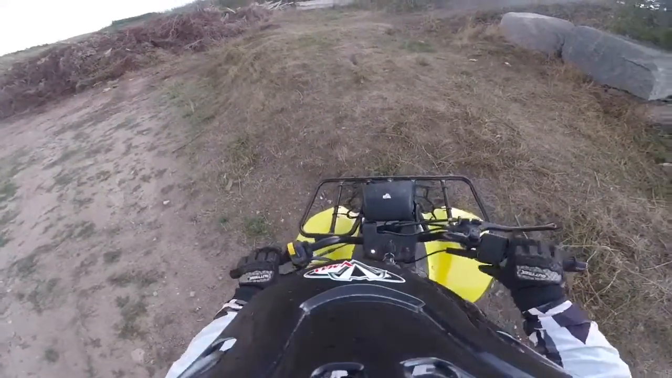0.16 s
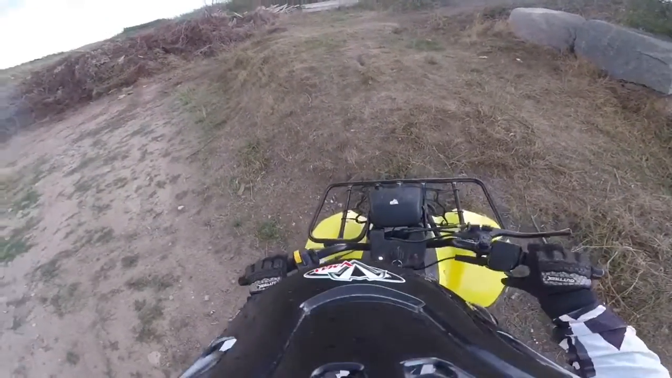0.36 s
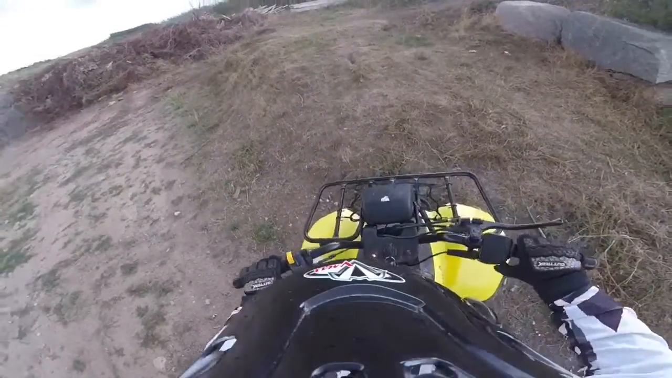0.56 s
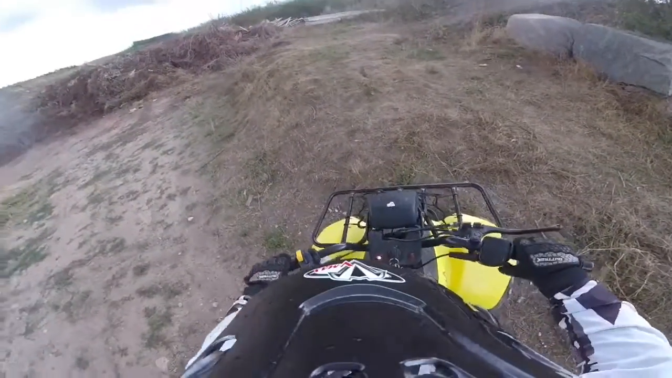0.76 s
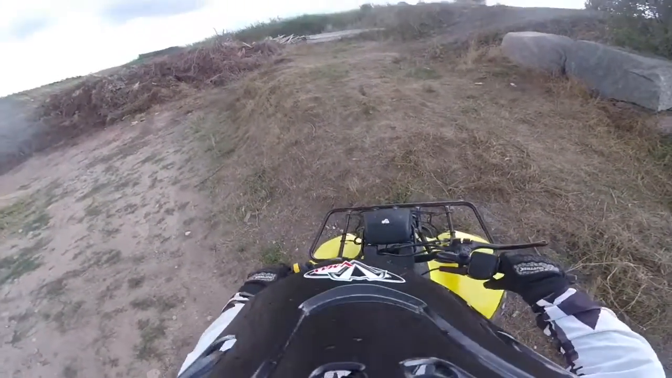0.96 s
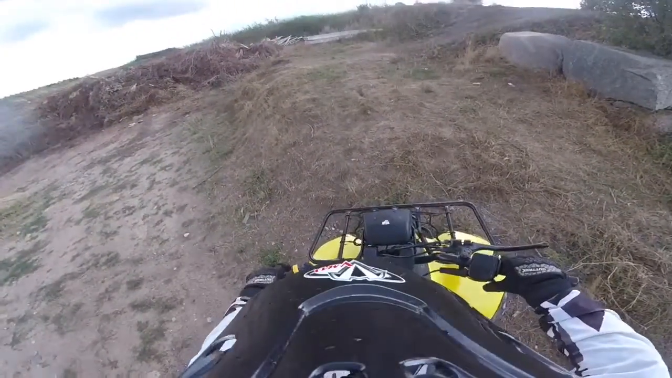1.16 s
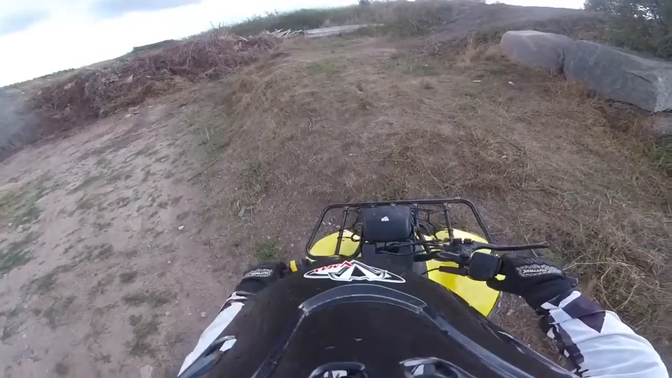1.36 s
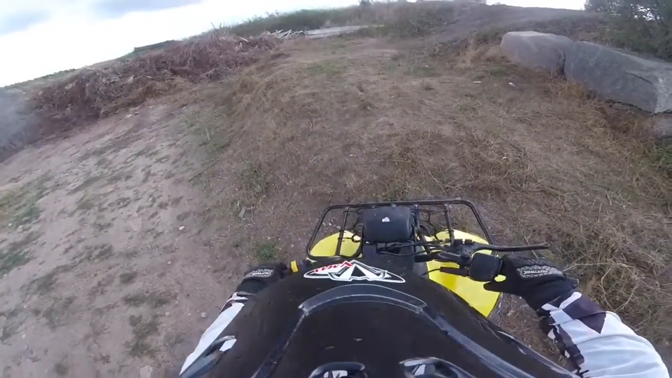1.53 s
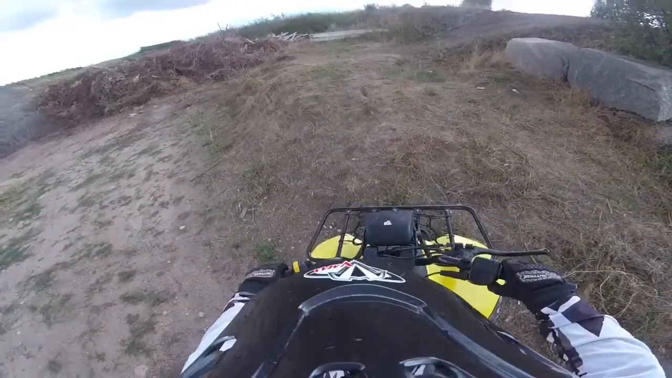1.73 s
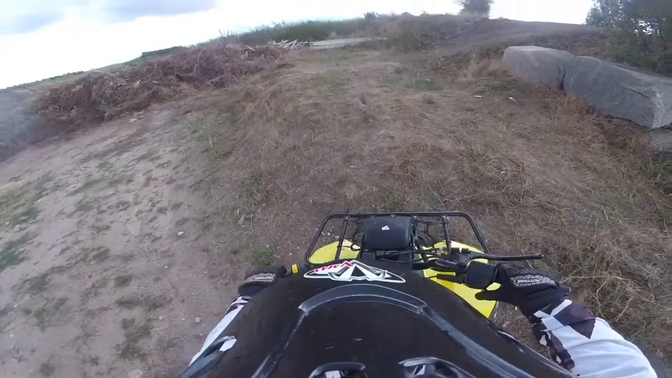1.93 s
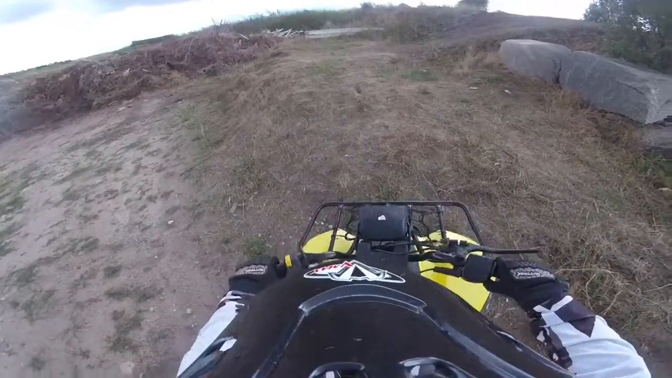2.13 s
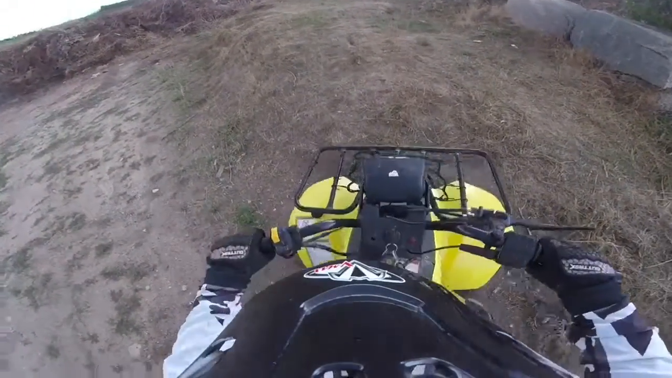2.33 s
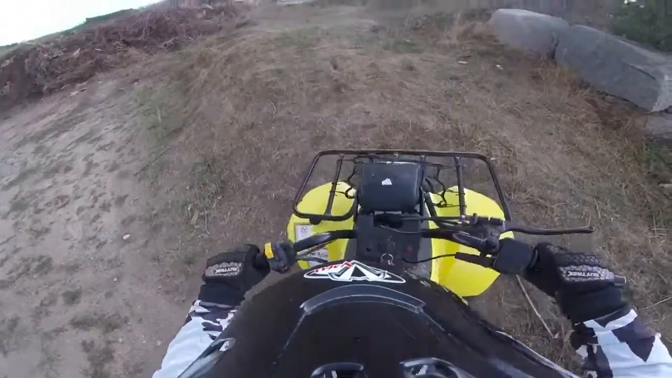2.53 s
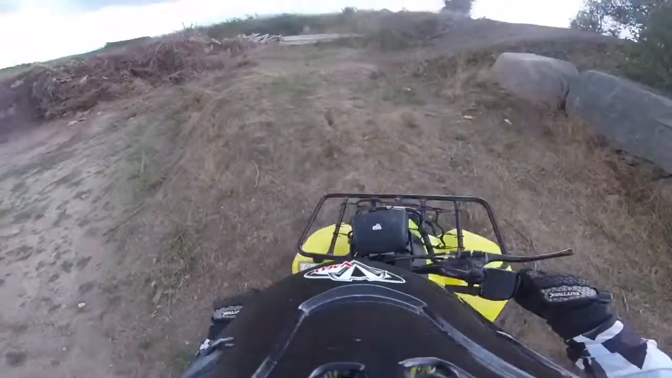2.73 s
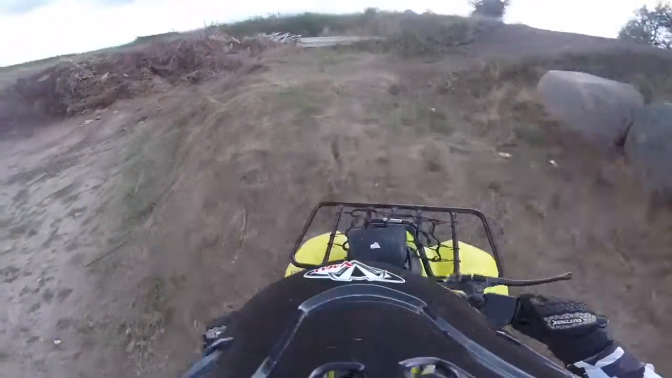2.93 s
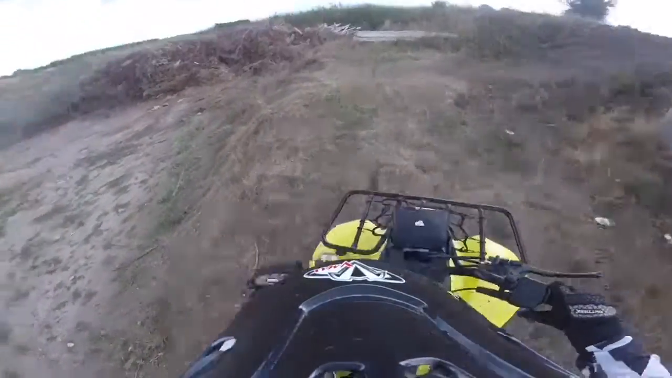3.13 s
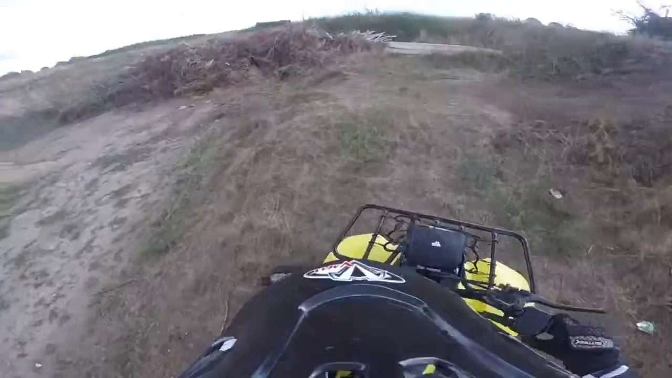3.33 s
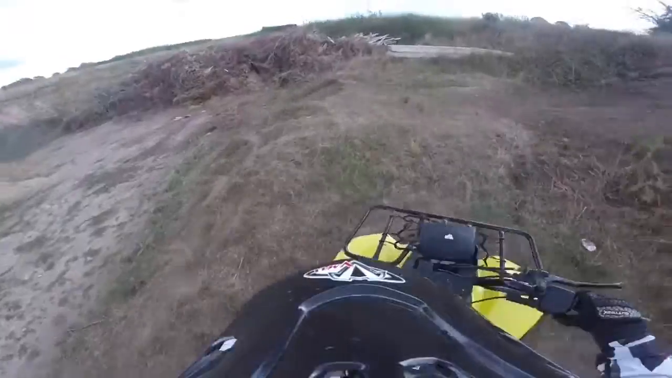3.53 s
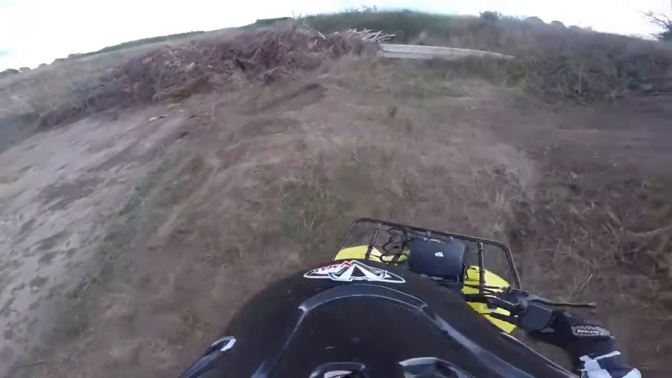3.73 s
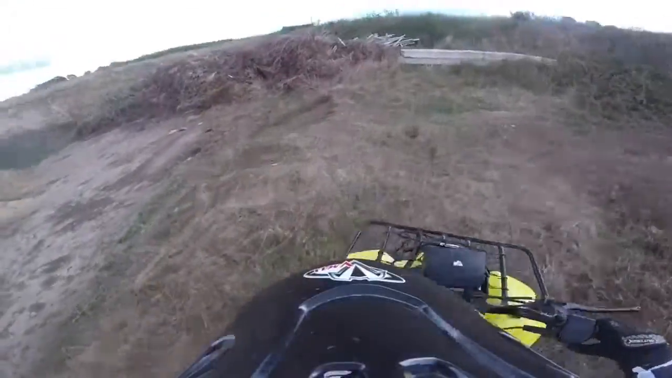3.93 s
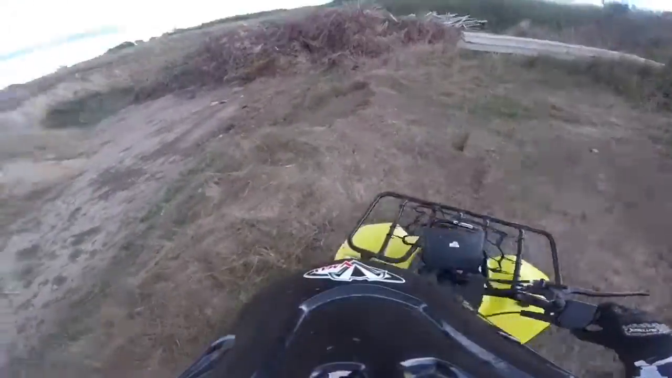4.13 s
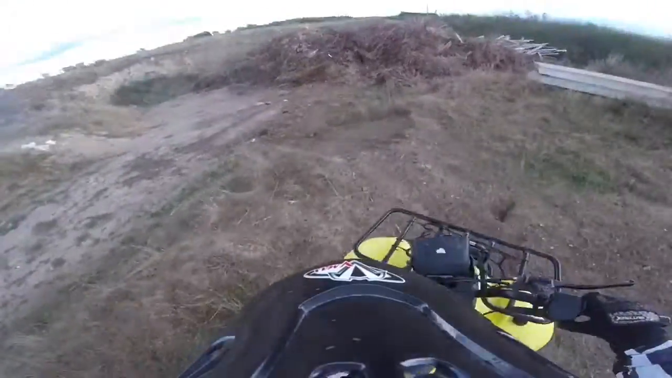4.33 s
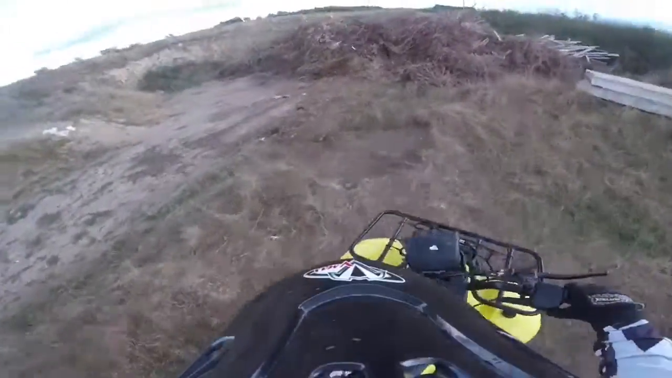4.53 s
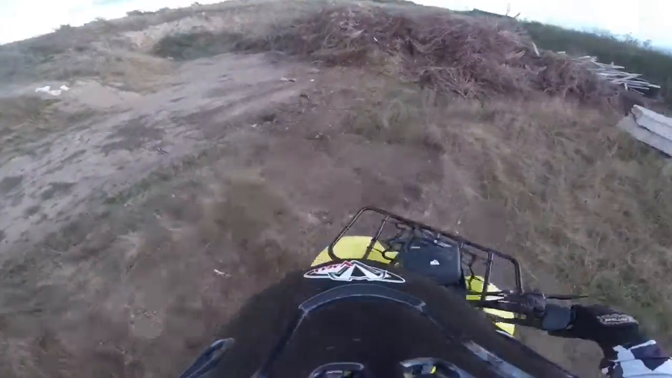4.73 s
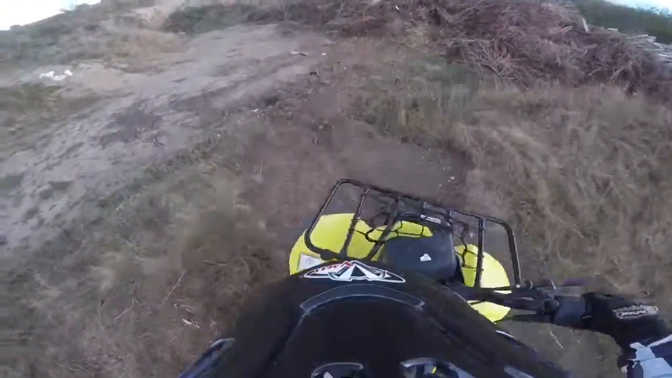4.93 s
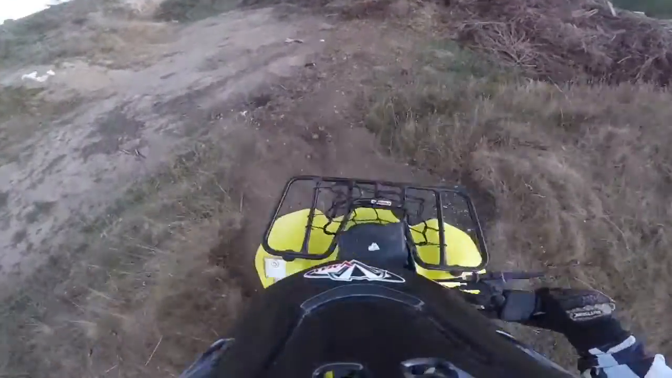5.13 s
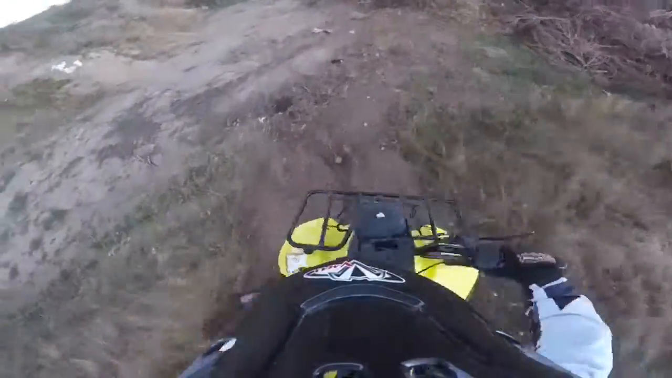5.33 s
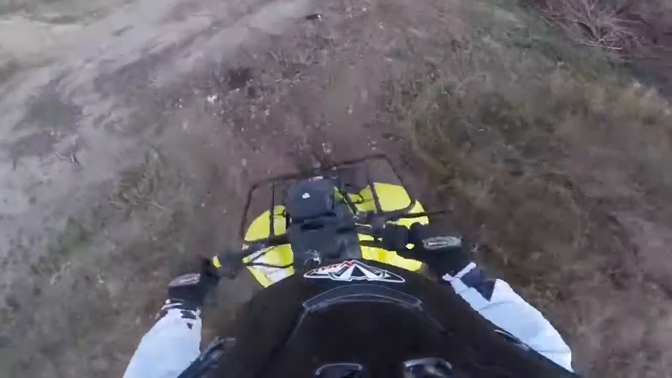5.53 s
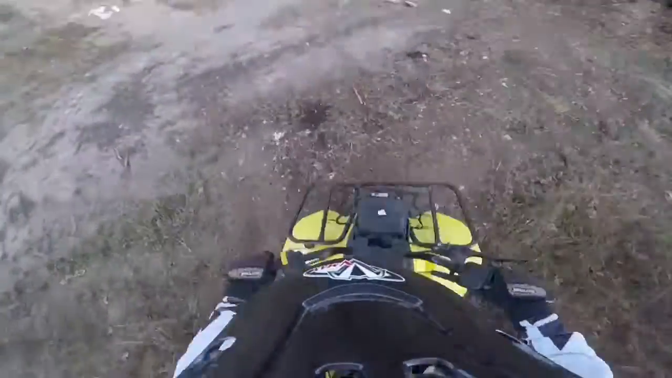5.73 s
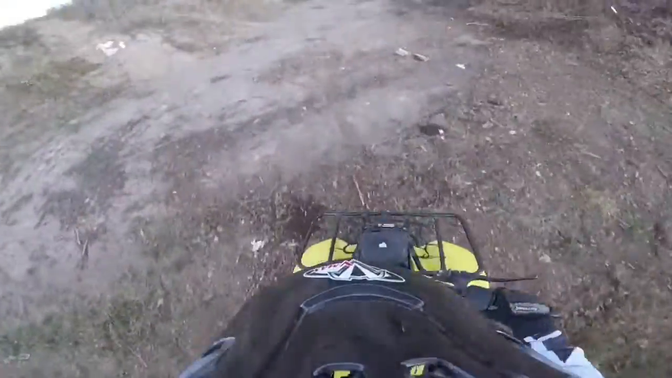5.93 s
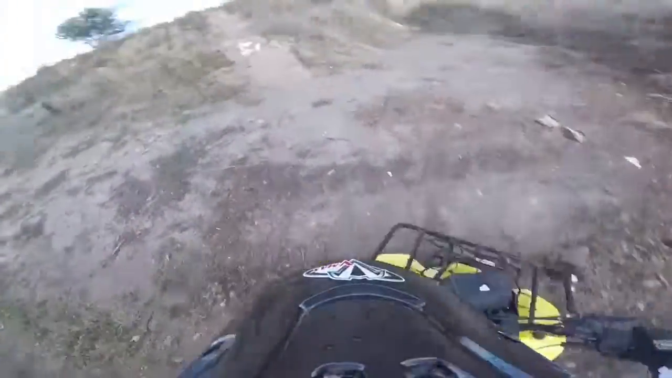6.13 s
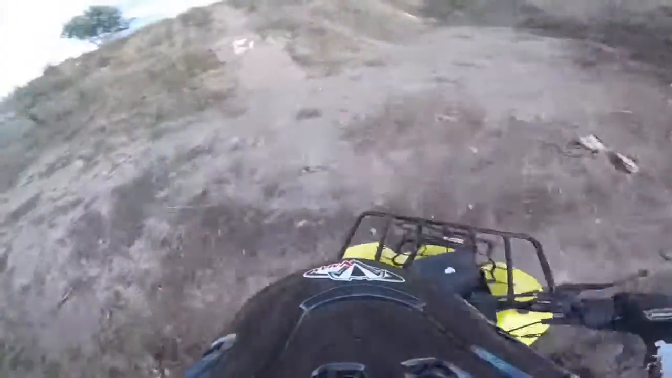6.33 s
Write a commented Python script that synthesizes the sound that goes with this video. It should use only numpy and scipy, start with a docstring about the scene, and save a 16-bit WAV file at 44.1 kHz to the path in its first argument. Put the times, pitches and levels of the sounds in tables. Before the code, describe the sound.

Single-cylinder quad engine starts and rides off over rough dirt, with uneven exhaust pops, rattling valve gear, low wind gusts, bumps and scuffs against a camera housing.

```python
"""A helmet camera in a closed housing on a quad bike, with wind heaving on the microphone throughout.
An insect buzzes and a jolt shakes the mount; then the starter whines and the single cylinder catches.
It stumbles and pulls away: firings boom and bark over clattering valve gear, and the drive line hums.
As it rolls, gusts swell, grit ticks, the mount squeaks and jolts, and strap and clothing scuff the housing.
Pops, grit and jolts are ringing resonances; wind, clatter and scuffs are shaped noise; whine and hum are sines."""
import sys
import numpy as np
from scipy import signal
from scipy.fft import rfft, irfft, next_fast_len
from scipy.io import wavfile
from scipy.ndimage import uniform_filter1d, map_coordinates

SR = 44100
rng = np.random.default_rng(int(sys.argv[2]) if len(sys.argv) > 2 else 0)


def to_wav(sig):
    """Store sig (one row per channel, or 1-D mono) as 16-bit WAV at the path in sys.argv[1].

    Samples outside -1..1 are clipped; the rate is SR.
    """
    pcm = np.clip(np.atleast_2d(sig), -1, 1) * 32767
    pcm = np.round(pcm).astype(np.int16)
    wavfile.write(sys.argv[1], SR, pcm.T)  # frames by channels


N = 280917

# starter gear: [t/s, tooth rate f/Hz, whine level/dB, grinding level/dB]
STARTER_GEAR = [(.495, 1050, -64, -44), (.51, 1080, -62, -48), (.555, 1120, -58, -44),
                (.572, 1150, -43, -44), (.592, 1345, -41, -44), (.612, 1385, -41, -43),
                (.635, 1250, -44, -41), (.648, 1180, -54, -44), (.66, 1150, -54, -52)]
# engine speed once it runs: [t/s, firing rate f/Hz]
ENGINE_SPEED = [(0.966, 19.365), (1.09, 26.032), (1.21, 22.267), (1.47, 25.319), (1.55, 24.684),
                (1.67, 30.809), (1.97, 31.215), (2.07, 28.371), (2.21, 31.016), (2.33, 28.634),
                (2.55, 30.0), (2.85, 37.086), (2.93, 43.598), (2.99, 42.161), (3.19, 35.262), (3.29, 34.67),
                (3.51, 24.144), (3.73, 26.713), (4.09, 21.48), (4.29, 26.426), (4.49, 21.192),
                (4.65, 26.056), (4.85, 26.32), (5.23, 24.276), (5.33, 20.905), (5.97, 36.652),
                (6.29, 35.062), (6.354, 30.975)]
# head wind, rising as the bike rolls: [t/s, heave level/dB, buffet level/dB]
HEAD_WIND = [(0, -58, -36), (.15, -35, -41.5), (.5, -32.5, -43.5), (.7, -42, -39), (1.7, -47, -44),
             (2.12, -45, -39), (2.27, -34, -28.5), (2.5, -28, -28.5), (3, -24.5, -29.5), (4.2, -26, -30),
             (4.6, -31.5, -39.5), (5.3, -35.5, -31), (5.6, -19.5, -30.5), (6.37, -29.5, -38.5)]
# colour of the pops as the rider's head and the load shift:
# [t/s, upper modes level/dB, body level/dB, rasp level/dB, bark warmth 0-1, puff warmth 0-1]
POP_TONE = [(.66, 1.5, 4, 5, 0, .2), (1.2, -0.5, -1, -3, 0.02, 0.15), (1.5, 0, 5.5, 9, 0.13, 0.1),
            (2.1, 0.5, -1, 1.5, 0.17, 0.1), (2.25, 0, 6.5, 1.5, 0.43, .5), (2.9, 0.5, 6.5, 6, 0.33, 1),
            (3.15, -4.5, 0.5, -3, 0.8, 0.4), (3.7, -1, 7, 2, 1, 0.1), (4.0, -7, -3, -2, 0.36, 0.3),
            (4.5, -3, -3, 3, 0.66, 0), (4.7, -1.5, 5, 5, 1, 0.4), (4.85, -10, 1.5, -10, 0.3, 1),
            (5.1, -11, -4.5, -6, .3, 1), (5.3, -7, -2.5, 3, 0.24, 0.32), (5.7, -6, 1.5, -5, 0.76, 0.55),
            (6.36, -10, 0, 8.5, 0.74, 1)]


def amp(db):
    """Amplitude factor of a level in dB."""
    return 10 ** (np.asarray(db) / 20)


def unit(x):
    """x scaled to rms 1."""
    return x / np.sqrt(np.mean(x ** 2) + 1e-20)


def curves(rows):
    """One value per sample for each column after the time."""
    s, *cols = np.transpose(rows)
    return [np.interp(np.arange(N) / SR, s, c) for c in cols]


def bumps(rows):
    """Bell-shaped swells at (middle s, length s); one sum for each further column."""
    s, length, *cols = np.transpose(rows)
    bell = np.exp(-((np.arange(N) / SR - s[:, None]) / length[:, None]) ** 2)
    return [c @ bell for c in cols]


def wobble(rate):
    """A smooth random curve, rate knots a second."""
    knots = rng.standard_normal(int(N * rate / SR) + 4)
    return map_coordinates(knots, [np.arange(N) * rate / SR])


def filtered(x, response):
    """x through a complex response given as a function of frequency in Hz."""
    m = next_fast_len(N + SR // 2)
    return irfft(rfft(x, m) * response(np.fft.rfftfreq(m, 1 / SR)), m)[..., :N]


def noise(spectrum):
    """Noise of rms 1 shaped by (Hz, dB per Hz) points read on a log axis."""
    f, db = np.transpose(spectrum)

    def response(hz):
        return amp(np.interp(np.log(hz + 1), np.log(f + 1), db, -120, -120))

    return unit(filtered(rng.standard_normal(N), response))


def steady(x):
    """x at rms 1 over short stretches, so that a level curve can play it."""
    return x / np.sqrt(np.abs(uniform_filter1d(x ** 2, size=SR // 6)) + 1e-12)


def resonate(x, modes):
    """x through causal resonances (Hz, width Hz, dB) summed with alternating sign."""
    def response(f):
        total = 0
        for k, (centre, width, db) in enumerate(modes):
            damping = 1j * f * width
            total = total + (-1) ** k * amp(db) * damping / (centre * centre - f * f + damping)
        return total

    return filtered(x, response)


def warmed(x, modes, heat, rise, widen):
    """x through resonances that move up by the factor rise and broaden by widen as the gas heats (0-1)."""
    out = 0
    steps = np.linspace(0, 1, num=4)
    for step in steps:
        share = np.clip(1 - np.abs(heat - step) / steps[1], 0, 1)  # crossfade between fixed heats
        hot_modes = [(hz * rise ** step, width * widen ** step, db) for hz, width, db in modes]
        out = out + resonate(share * x, hot_modes)
    return out


def hillside():
    """The quiet air of the hillside through the housing, as noise of slowly wavering level."""
    # air spectrum: [f/Hz, level per Hz/dB]
    air = [(120, -40.5), (200, -3), (385, -6), (1070, -17.5), (1400, -14.5), (2200, -23.5), (2900, -23.5),
           (4000, -27), (4600, -29), (5500, -27.5), (8000, -32.5), (12000, -41), (13200, -73.5)]
    return amp(-57 + 2 * wobble(11)) * noise(air)


def wind():
    """Slow pressure heaves, quicker lumps of turbulence and the rumble of rolling, all swelling in gusts."""
    # spectra of heave, buffet, and tyre and frame rumble on the track: [f/Hz, level per Hz/dB]
    heave_spectrum, buffet_spectrum, roar_spectrum = [(2, 8.5), (6, -5), (18, -8.5), (26, -45.5),
                                                      (40, -61.5)], [(14, -43.5), (22, -1), (32, -11),
                                                                     (45, -21.5), (80, -16), (160, -29),
                                                                     (260, -47)], [(60, -31.5), (90, -4),
                                                                                     (140, 0), (200, -8.5),
                                                                                     (280, -17.5),
                                                                                     (400, -46)]
    # strong gusts: [middle t/s, length t/s, heave level/dB, buffet level/dB]
    gusts = [(2.22, 0.047, -23.5, -50), (2.837, 0.05, -12.5, -26.5), (3.625, 0.056, -26, -30),
             (4.328, 0.031, -20.5, -34), (5.152, 0.041, -19.5, -56), (5.404, 0.028, -16.5, -43),
             (5.491, 0.016, -12, -45), (5.737, 0.06, -9.5, -21.5), (5.999, 0.022, -17.5, -43),
             (6.241, 0.061, -12, -21), (6.371, 0.11, -12.5, -21.5)]
    heave_db, buffet_db = curves(HEAD_WIND)
    heave, buffet = bumps([(s, length, amp(low), amp(high)) for s, length, low, high in gusts])
    shared = wobble(6.3)
    heave = heave + amp(heave_db + 2 * wobble(16) + 1.5 * shared)
    buffet = buffet + amp(buffet_db + 2 * wobble(12) + 1.7 * shared)
    # the rumble grows with rolling speed, felt as head wind
    roar_gain = amp(-49 + 2 * wobble(24)) * (buffet / amp(-27.5)) ** 0.99
    roar = roar_gain * noise(roar_spectrum)
    heaving = unit(np.tanh(steady(noise(heave_spectrum))))
    buffeting = steady(amp(4.3 * wobble(13)) * noise(buffet_spectrum))
    return heave * heaving + buffet * buffeting + roar


def insect():
    """Short bouts of buzz: one narrow band of noise switched softly on and off."""
    # bouts: [start t/s, end t/s, level/dB]
    bouts = [(0.166, 0.24, -71), (0.253, 0.515, -71.5), (0.74, 0.85, -68), (0.894, 0.983, -74),
             (1.07, 1.153, -73), (1.23, 1.318, -75), (1.733, 1.853, -77)]
    t = np.arange(N) / SR
    gain = sum(amp(db) * ((t > start) & (t < end)) for start, end, db in bouts)
    band = noise([(5900, -24), (6300, -20), (6550, 0), (6850, -31), (7200, -34.5)])
    return uniform_filter1d(gain, size=600) * band


def scuffs():
    """Strap and clothing rub the housing: strokes that swell and fade, made of clumped uneven slips."""
    # rubs: [start t/s, length t/s, level/dB, dull part relative level/dB]
    rubs = [(3.905, 0.08, -51, -8), (5.385, 0.035, -43.5, -4), (5.417, 0.034, -39, -2),
            (5.464, 0.084, -43, -6), (5.583, 0.027, -45.5, 1), (5.619, 0.062, -39.5, 2.5),
            (5.724, 0.049, -39.5, 2), (5.873, 0.05, -46, 0)]
    # spectra of the bright and the dull part: [f/Hz, level per Hz/dB]
    bright, dull = [(1500, -15), (2200, -2), (2600, 3), (3500, 5.5), (5000, -26), (7000, -23), (12500, -50),
                    (14000, -70)], [(500, -21), (800, -8), (1400, 2), (2000, -3), (2600, -33)]
    slips_per_s, slip_spread_db, slip_decay_s = 900, 4, .0012
    t = np.arange(N) / SR
    out = 0
    for spectrum, is_dull in ((bright, 0), (dull, 1)):
        stroke = np.zeros(N)
        for start, length, db, dull_db in rubs:
            swell = np.sin(np.pi * np.clip((t - start) / length, 0, 1))
            stroke += amp(db + is_dull * dull_db) * swell
        slip_size = amp(slip_spread_db * rng.standard_normal(N) + 4 * wobble(90))
        slips = (rng.random(N) < slips_per_s / SR) * slip_size
        grit = signal.lfilter([1], [1, -np.exp(-1 / (slip_decay_s * SR))], slips)
        grit = uniform_filter1d(uniform_filter1d(grit, size=40), size=40)  # cloth softens each slip
        out = out + stroke * unit((unit(grit) + 0.5) * noise(spectrum))
    return out


def squeaks():
    """Faint, high, slightly unsteady tones from the mount, as sines under bell-shaped swells."""
    # squeaks: [middle t/s, f/Hz, length t/s, level/dB]
    chirps = [(3.2, 11800, 0.013, -65), (3.35, 11800, .012, -74), (3.932, 11900, .012, -68)]
    t = np.arange(N) / SR
    waver = 1.5 * wobble(150)
    out = 0
    for s, hz, length, db in chirps:
        out = out + amp(db) * np.exp(-((t - s) / length) ** 2) * np.sin(2 * np.pi * hz * t + waver)
    return out


def ticks():
    """Each grain of grit cracks and rings the small modes of the housing at new strengths."""
    # grit hits: [t/s, peak level less 1 dB/dB, low level/dB, treble level/dB, top treble level/dB]
    grains = [(0.5, -36, 10, 1, -23), (1.378, -14.5, 2.5, 0, -17.5), (1.506, -10.5, 1, 3, -18.5),
              (2.47, -15.5, -1, -6, -30.5), (3.064, -23, 0, -6, -55), (3.42, -25, 2, -20, -39),
              (3.4837, -6.5, -12, -9, -34), (3.5332, -26.5, -1, -9, -26), (3.5764, -26.5, 3, -3, -27),
              (3.59, -27.5, -3, -9, -35), (3.7944, -6, -1, 5.5, -18), (3.9294, -32.5, -1, -4, -17),
              (4.1584, -24, -11, -8, -29), (4.2093, -35, 1, -15, -52), (4.2362, -28, 3, -28, -44),
              (4.2623, -21.5, -1, -8, -37), (4.3585, -34, -5, -28, -48), (4.442, -33, 1.5, -5, -20),
              (4.512, -28, 0, -5, -23), (4.7843, -25, 0.5, -9, -32), (5.405, -26, 0, 7, -22.5),
              (5.442, -26.5, 6, -20, -42), (5.461, -37, -4, -10, -21), (5.471, -22, 8, -6, -39),
              (5.494, -33, -4, -10, -15), (5.605, -37.5, -4, -8, -9.5), (5.626, -24, 11.5, 4, -16),
              (5.66, -38, 7, -11, -30), (5.72, -38, -10, -5, -20), (5.738, -26, 7, -15, -40),
              (5.884, -19.5, 12.5, -2, -13.5), (5.908, -26.5, 11, -4, -39), (5.932, -38, 3, -12, -30)]
    # housing modes: [f/Hz, level/dB, 60 dB decay t/s]
    shell = [(1463, -11, 0.013), (2070, -15.5, 0.011), (2533, -8.5, 0.012), (2718, -5, 0.013),
             (2985, -4, .008), (3390, -5.5, 0.0093), (4003, -5.5, 0.0097), (4426, -9.5, 0.0098),
             (5850, 7, 0.0064), (7160, 3.5, 0.0042), (9570, -14.5, 0.0052), (12150, 0.5, 0.0031),
             (15000, -20.5, .005)]
    hz, mode_db, t60 = np.transpose(shell)[:, :, None]
    out, t = np.zeros(N + SR), np.arange(SR // 20) / SR
    for s, db, low_db, treble_db, top_db in grains:
        band_db = np.select([hz > 5200, hz > 2800, hz > 2200], [top_db, treble_db, 0], low_db)
        strength_db = rng.normal(0, 2.5, hz.shape)
        bend = rng.normal(0, .01, hz.shape)
        decay = amp(mode_db + band_db + strength_db - 60 * t / t60)
        ring = np.sum(decay * np.sin(2 * np.pi * hz * (1 + bend) * t), axis=0)
        crack = amp(top_db - 3 - 60 * t / 0.0057) * np.diff(rng.standard_normal(len(t) + 1))
        hit = (ring + crack) * (1 - np.exp(-t / 0.00067))
        out[round(s * SR):][:len(t)] += amp(db + 1) * hit / np.abs(hit).max()
    return out[:N]


def jolts():
    """A bump sets the springy mount shaking for some cycles, with a weaker, higher second mode."""
    # jolts, each starting 4 ms ahead of its time: [t/s, level/dB, ring f/Hz, length t/s]
    knocks = [(.062, -27, 142, 0.034), (0.254, -21.5, 80, 0.033), (2.306, -23.5, 63, 0.03),
              (3.023, -19, 127, 0.034), (3.076, -24.5, 115.3, 0.037), (3.136, -24, 103.6, 0.16),
              (3.451, -18.5, 132, 0.047), (3.906, -19, 125.6, 0.047), (3.93, -18, 123, 0.022),
              (4.61, -19, 128, 0.035), (5.127, -29, 120, 0.046), (5.35, -25.5, 124.7, 0.049),
              (5.419, -14, 125.4, 0.025), (5.708, -12, 121, 0.015), (5.776, -15, 129.5, 0.031),
              (5.961, -26.5, 131.3, 0.066), (6.218, -13.5, 113, 0.047)]
    out, t = np.zeros(N + SR), np.arange(SR // 3) / SR
    for s, db, hz, length in knocks:
        shape = (1 - np.exp(-t / 0.0039)) * np.exp(-(t / length) ** 2)
        second = np.sin(2 * np.pi * 1.462 * hz * t + rng.uniform(0, 6.3))
        shake = np.sin(2 * np.pi * hz * t) + 0.18 * second
        out[round((s - .004) * SR):][:len(t)] += amp(db) * shape * shake
    return out[:N]


def starter():
    """Gear teeth whine up and sag as the piston reaches compression: wavering harmonics over grinding noise."""
    tooth_hz, whine_db, grind_db = curves(STARTER_GEAR)
    phase = 2 * np.pi * np.cumsum(tooth_hz * (1 + .018 * wobble(260))) / SR
    teeth = 0
    for k, db in enumerate([-1, -6, -8.5, -19, -26, -29.5, -34], start=1):
        teeth = teeth + amp(db + 4 * wobble(89.9)) * np.sin(k * phase)
    grind_spectrum = [(700, -8), (1250, -8), (1600, 2), (2100, -15), (2700, -1), (3400, 2.5),
                      (4400, -14), (8000, -28), (13000, -36)]  # (Hz, dB per Hz)
    grind = amp(3 * wobble(110)) * noise(grind_spectrum)
    t = np.arange(N) / SR
    on = (t > STARTER_GEAR[0][0]) & (t < STARTER_GEAR[-1][0])
    return uniform_filter1d(1.0 * on, size=300) * (amp(whine_db) * teeth + amp(grind_db) * grind)


def hum():
    """One smooth low sine that glides with the drive line as the clutch takes up."""
    # drive line: [t/s, f/Hz, rms level/dB]
    drive_line = [(1.82, 133, -58), (1.87, 130.5, -41), (1.99, 122.5, -32.5), (2.12, 111, -33),
                  (2.18, 107, -58)]
    hz, level_db = curves(drive_line)
    return np.sqrt(2) * amp(level_db + .8 * wobble(11)) * np.sin(2 * np.pi * np.cumsum(hz) / SR)


def firings():
    """Sample of each firing: the uneven catch, then one per working stroke with a little scatter."""
    # the first, uneven firings as the engine catches: [t/s]
    first_firings = [.6645, .7328, .7852, .8311, .8735, .9259]
    t = np.arange(N) / SR
    cycles = np.cumsum(curves(ENGINE_SPEED)[0] * (t >= ENGINE_SPEED[0][0])) / SR
    strokes = np.interp(np.arange(int(cycles[-1]) + 1) + 1e-6, cycles, t)
    s = .0004 + np.r_[first_firings, strokes + .00012 * rng.standard_normal(len(strokes))]
    return np.round(s[s < N / SR - .002] * SR).astype(int)


def throttle_levels():
    """Level curves (dB) of puff and bark: the throttle, less the stumbles, plus bark changes at firings."""
    # throttle: [t/s, exhaust puff level/dB, sharp bark level relative to the puff/dB]
    throttle = [(.66, -34, 8.5), (.85, -32, -2), (1.14, -32.5, 5), (1.45, -29, -2), (1.72, -32, 2),
                (2.1, -33.5, 0), (2.22, -31, 6), (2.65, -31, 5), (2.95, -32.5, 4.5), (3.08, -32, -5.5),
                (3.45, -32.5, -5), (3.7, -33.5, -0.5), (3.9, -35.5, -14), (4.2, -32.5, -16),
                (4.55, -36.5, -13), (4.66, -33, -1.5), (4.85, -31, -11.5), (5.2, -32.5, -12),
                (5.45, -35, -5), (5.6, -33, -13.5), (6.0, -34, -4), (6.12, -30.5, -6.5), (6.36, -28, -5)]
    # weak burns, where the engine stumbles: [middle t/s, length t/s, puff loss/dB, further bark loss/dB]
    stumbles = [(1.02, 0.047, 11, 23), (1.375, 0.063, 11.5, 19.5), (1.61, 0.05, 17.5, 9),
                (1.984, 0.01, 10, 9), (2.155, 0.0081, 2, 8), (3.126, 0.01, -3.5, 15),
                (3.49, 0.038, 3.5, 14), (3.81, 0.056, 12.5, 8), (4.39, 0.041, 2.5, 8),
                (5.24, 0.032, 2.5, 17), (6.05, 0.021, 7, 25)]
    # bark level changes at single firings, louder or softer: [t/s, bark gain/dB]
    bark_changes = [(.665, 1), (.785, 2.5), (.831, 8), (1.136, 2), (1.179, -2), (1.266, 2.5), (1.433, 21.5),
                    (1.473, 2), (1.513, 4), (1.695, 0.5), (2.188, 0), (2.252, 2.5), (2.287, 2),
                    (2.39, -1.5), (2.424, -3.5), (2.46, -2), (2.527, 2.5), (2.625, 3), (2.657, 5),
                    (2.83, 1), (2.857, 3.5), (3.658, 2.5), (4.11, 12.5), (4.277, 11.5), (4.439, 8),
                    (5.902, -6), (6.095, 4.5)]
    puff_db, bark_db = np.subtract(curves(throttle), bumps(stumbles))
    change_s = .012
    bark_db = bark_db + bumps([(s, change_s, db) for s, db in bark_changes])[0]
    return puff_db, bark_db


def clatter_level():
    """Mechanical level curve (dB): growing with engine speed and with rolling speed, felt as head wind."""
    speed_part = 0.45 * (curves(ENGINE_SPEED)[0] - 25)
    rolling_part = 0.39 * (curves(HEAD_WIND)[1] + 36)
    turning = np.arange(N) / SR > STARTER_GEAR[0][0]
    resting_db = -61  # before the starter turns
    return uniform_filter1d(np.where(turning, -50 + speed_part + rolling_part, resting_db), size=600)


def per_firing(curve, scatter, at, last):
    """The curve read at each firing with random scatter, held until the next."""
    return (curve[at] + scatter * rng.standard_normal(len(at)))[last]


def valve(x):
    """x softened, because the exhaust valve opens in a finite time."""
    return filtered(x, lambda hz: 1 / (1 + 1j * hz / 2600) ** 3)


def exhaust_puff(kick, blast, puff_db, effort, at, last):
    """Kick and blast ring the tail pipe, whose modes rise with heat, and the broad body of the pop."""
    # lower and upper tail pipe modes, broad body of the pop: [f/Hz, width f/Hz, level/dB]
    lower_modes, upper_modes, body_modes = [(280.2, 41.3, 5.5), (371, 65, -6.5)], [(459.9, 24.6, 8), (523, 52, 2.5), (576.5, 78, -5)], [(684, 128, -12.5), (834, 90, -14),
                                                                        (1035, 150, -15.5)]
    honk_db, body_db, _, _, warmth = curves(POP_TONE)
    gain = amp(per_firing(puff_db, 1, at, last))
    honk = amp(per_firing(honk_db, 1.5, at, last))
    body = amp(per_firing(body_db, 1.5, at, last))
    heat = np.clip(per_firing(warmth, .09, at, last), 0, 1)
    mixed = valve(unit(kick) + 0.16 * unit(blast))
    ragged = valve(.7 * unit(kick) + .7 * unit(blast))
    puff = warmed(gain * mixed, lower_modes, heat, rise=1.076, widen=1.33)
    puff = puff - warmed(gain * honk * mixed, upper_modes, effort, rise=1.078, widen=1)
    puff = puff - resonate(gain * body * ragged, body_modes)
    return puff / resonate(mixed, lower_modes).std()


def exhaust_bark(kick, blast, level_db, at, last):
    """The sharp bark, rung by the kick, its echo from the pipe end and a short turbulent blast."""
    # bark, and the silencer shell rung unevenly: [f/Hz, width f/Hz, level/dB]
    bark_modes, rasp_modes = [(1210, 110, -12.5), (1425, 61.3, 8), (1637, 239, -4.5), (1943, 220, -15)], [(2060, 190, -19), (2560, 58, -8.5), (3400, 630, -20)]
    _, _, rasp_db, warmth, _ = curves(POP_TONE)
    gain = amp(per_firing(level_db, 2, at, last))
    rasp = amp(per_firing(rasp_db, 3, at, last))
    warm = np.clip(per_firing(warmth, .2, at, last), 0, 1)
    echo = np.roll(kick, 92)
    sharp = valve(unit(kick) + 1.03 * unit(echo) + 1.39 * unit(blast))
    bark = warmed(gain * sharp, bark_modes, warm, rise=1.051, widen=2)
    bark = bark + resonate(gain * rasp * sharp, rasp_modes)
    return bark / resonate(sharp, bark_modes).std()


def frame_boom(at):
    """The piston shakes the frame at every crank turn, twice per firing, and the low modes boom."""
    # low boom of frame and silencer: [f/Hz, width f/Hz, level/dB]
    low_modes = [(56.5, 15.7, 0), (112.2, 18.4, 8)]
    # boom, played 1.5 dB louder: [t/s, level/dB]
    boom_curve = [(.43, -60), (.7, -37.5), (.85, -42.5), (1.2, -36.5), (1.5, -39.5), (1.8, -42), (1.9, -48),
                  (2.15, -48), (2.25, -41.5), (2.68, -53), (2.94, -30), (3.1, -38.5), (3.65, -36.5),
                  (3.9, -30.5), (4.26, -43), (4.6, -38.5), (4.8, -39), (5.07, -36.5), (6.37, -40)]
    turns = np.zeros(N)
    turns[at] = 3.5
    turns[(at[1:] + at[:-1]) // 2] = 1
    push = filtered(turns, lambda hz: 1 / (1 + 1j * hz / 140) ** 2)
    return amp(curves(boom_curve)[0] + 1.5) * unit(resonate(push, low_modes))


def valve_clatter(gate, clatter_db):
    """Valve gear rattles as grainy gated noise while fins and covers sing in patches."""
    # clatter spectrum: [f/Hz, level per Hz/dB]
    clatter_spectrum = [(1200, -5.5), (1900, -11), (2240, -19.5), (2600, -8), (3300, -6), (3900, -19.5),
                        (4500, -23.5), (5000, -29.5), (5900, -25), (7000, -33), (9000, -45), (12000, -62.5),
                        (13200, -68)]
    # fins and covers: [f/Hz, width f/Hz, level over the clatter/dB]
    fins = [(2656, 43, -15.5), (3260, 170, -11), (3560, 41, -18)]
    grain = amp(2.7 * wobble(220) + wobble(10))
    clatter = unit(gate * grain * noise(clatter_spectrum))
    for hz, width, db in fins:
        shaken = amp(5 * wobble(28)) * rng.standard_normal(N)
        ringing = resonate(resonate(shaken, [(hz, width, 0)]), [(hz, 3 * width, 0)])
        clatter = clatter + amp(db) * unit(ringing)
    return amp(clatter_db + 0.46) * clatter


def engine():
    """Each firing kicks the tail pipe alike and blows a blast; pops join the frame boom and the clatter."""
    # broad engine rattle, strongest just after each firing: [f/Hz, level per Hz/dB]
    rattle_spectrum = [(88, -43.5), (150, -11), (199, -3.5), (300, -0.5), (402, -0.5), (478, -5), (614, -6),
                       (1130, -13), (1440, -15.5), (2000, -26), (2600, -59.5), (4400, -120)]
    # a side chamber of the silencer swallows one band: (f/Hz, width f/Hz, depth 0-1)
    side_chamber = (411.5, 35, 0.71)
    at = firings()
    last = np.clip(np.searchsorted(at, np.arange(N), "right") - 1, 0, None)  # latest firing
    age = np.arange(N) / SR - at[last] / SR
    running = age >= 0
    age = np.abs(age)
    beat = np.gradient(at)[last] / SR
    puff_db, bark_db = throttle_levels()
    clatter_db = clatter_level()

    kick = np.zeros(N)
    kick[at + 30] = -1
    blast_shape = (1 - np.exp(-age / 0.01)) * np.exp(-age / 0.0045)
    blast = running * blast_shape * rng.standard_normal(N)
    effort = np.clip((clatter_db + 51.5) / 11, 0, 1)  # working hard, it clatters more and runs hotter
    puff = exhaust_puff(kick, blast, puff_db, effort, at, last)
    bark = exhaust_bark(kick, blast, puff_db + bark_db, at, last)

    # the rattling goes on all the time, more just after a firing and half a cycle later
    after_firing = 0.65 * np.exp(-age / 0.059) + 0.46 * np.exp(-age / 0.007)
    half_cycle = 0.13 * np.exp(-((age / beat - .5) / 0.027) ** 2)
    gate = 1 + running * (after_firing + half_cycle)
    rattle_gain = running * amp(uniform_filter1d(puff_db, size=4000) - 15)
    rattle = rattle_gain * unit(gate * noise(rattle_spectrum))

    pipe = amp(-5.5) * puff + rattle
    hz, width, depth = side_chamber
    pipe = pipe - depth * resonate(pipe, [(hz, width, 0)])
    return pipe + amp(-4.5) * bark + frame_boom(at) + valve_clatter(gate, clatter_db)


def scene():
    """All layers summed, from the hillside air to the engine."""
    surroundings = hillside() + wind() + insect()
    housing = scuffs() + squeaks() + ticks() + jolts()
    return (surroundings + housing + starter() + hum() + engine())[None]


def record(dry):
    """The camera rounds off its loudest peaks and keeps nothing above its band limit."""
    ceiling, top_hz = .72, 16300
    rounded = dry / (1 + np.abs(dry / ceiling) ** 6) ** (1 / 6)
    return filtered(rounded, lambda hz: hz < top_hz)


dry = scene()
out = record(dry)
to_wav(out)
```